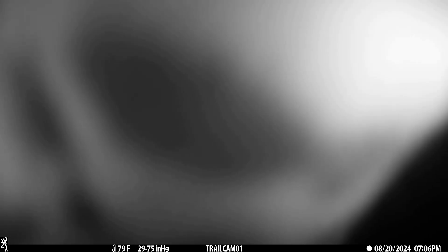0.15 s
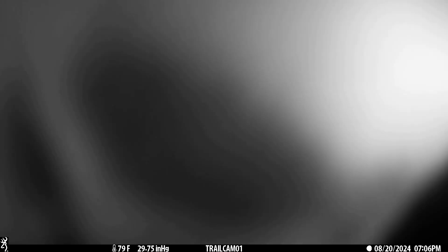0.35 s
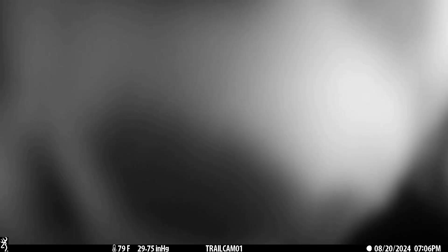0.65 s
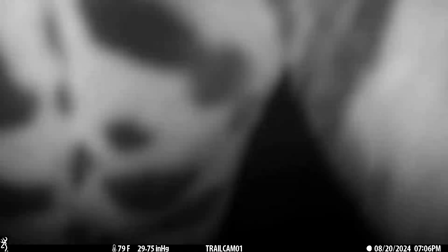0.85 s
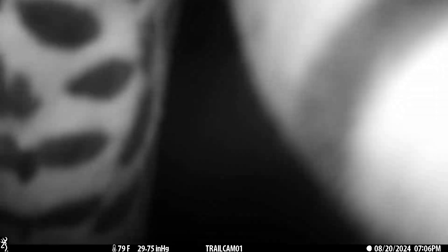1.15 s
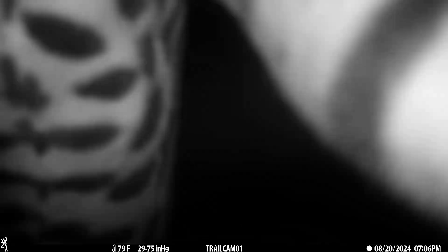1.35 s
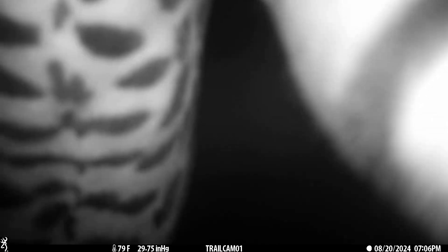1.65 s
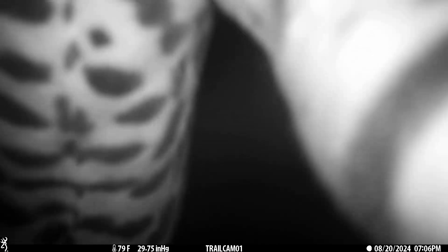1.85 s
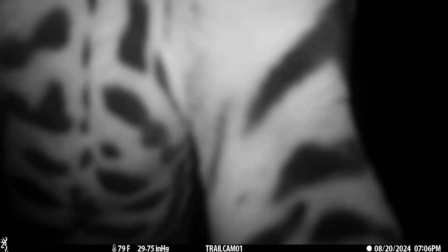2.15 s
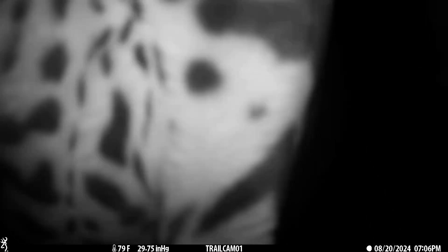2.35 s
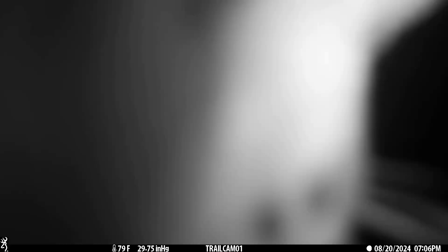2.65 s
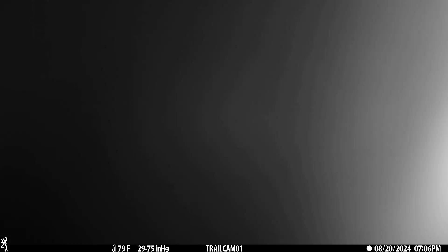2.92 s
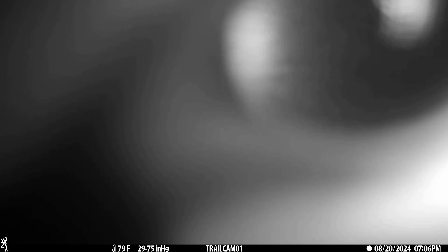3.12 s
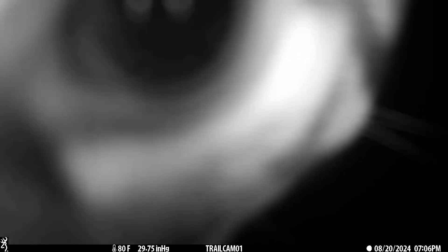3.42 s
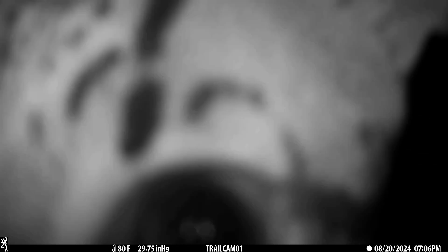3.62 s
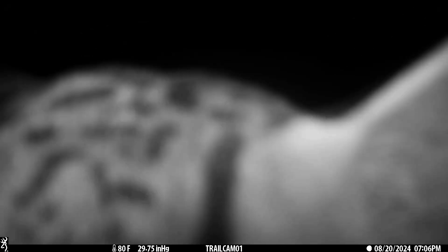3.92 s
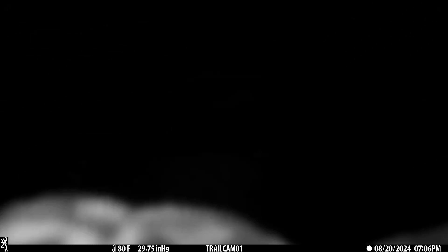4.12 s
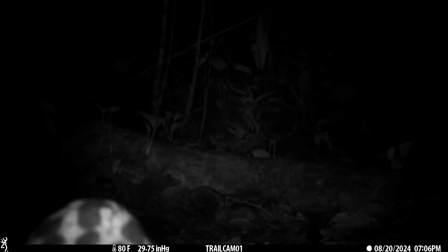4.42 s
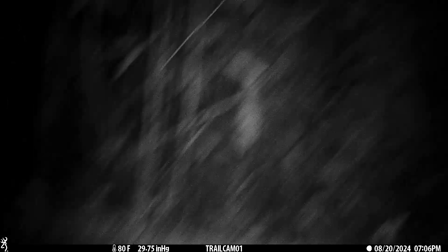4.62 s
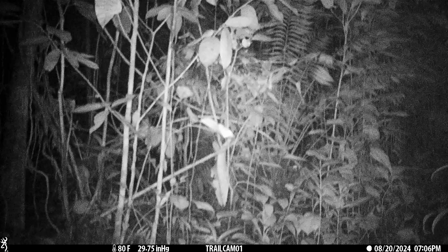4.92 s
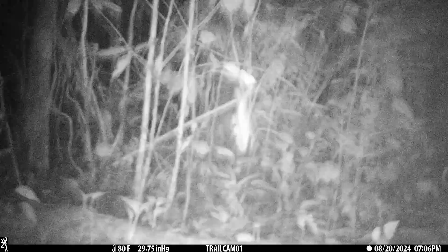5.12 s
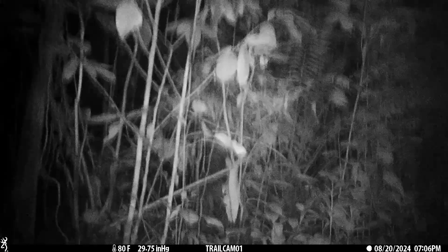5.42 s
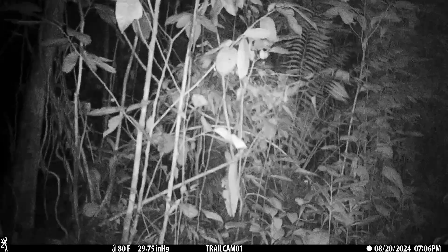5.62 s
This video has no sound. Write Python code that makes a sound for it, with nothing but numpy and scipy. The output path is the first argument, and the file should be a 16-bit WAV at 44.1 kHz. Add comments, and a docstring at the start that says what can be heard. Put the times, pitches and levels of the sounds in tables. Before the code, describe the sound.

A wild cat rubs against a plastic camera case with scrapes, clicks and knocks, then rustles leaves, over night insects and steady hiss.

```python
"""A wild cat rubs its head along a trail camera, then walks off and bumps the mount.
Rough strokes and single slips ring the plastic shell; the hardest slips overload the input.
Blows thud and ring the hollow case, fur brushes it, paws crackle in the leaf litter.
Behind it all, night insects of the forest sing at 4-8 kHz over a steady hiss."""
import sys
import numpy as np
from scipy import signal
from scipy.fft import rfft, irfft, next_fast_len
from scipy.io import wavfile
from scipy.ndimage import uniform_filter1d

SR = 44100
rng = np.random.default_rng(int(sys.argv[2]) if len(sys.argv) > 2 else 0)


def unload_wav(signal):
    """Save mono or channel-first audio to the path in sys.argv[1] as 16-bit WAV at rate SR, clipped to [-1, 1]."""
    wavfile.write(
        sys.argv[1],
        SR,
        np.round(np.clip(np.atleast_2d(signal).T, -1, 1) * 32767).astype(np.int16),
    )


N = 254456
TIME = np.arange(N) / SR


# Spectrum of a push on the whole case: (frequency [Hz], gain [dB])
PUSH_SPECTRUM = [(20, -11), (70, -5.5), (200, -5.5), (310, -11.5), (440, 7.5), (560, 0), (1200, -2.5),
                 (2200, 1), (3500, 3), (5500, -18), (12000, -57)]
# Hard strokes: (peak time [s], length [s], shell level [dB], push level [dB], squeak pitch [Hz])
HEAD_STROKES = [(0.404, 0.055, -26.5, -38, 3340), (.495, .027, -26, -35.5, 3200),
                (0.569, 0.044, -33, -39, 3100), (.607, .017, -23.5, -38.5, 3270),
                (0.636, .045, -31.5, -41, 2920), (0.709, .07, -35.5, -45, 3090),
                (1.223, .09, -33, -54, 3180), (1.275, .018, -24, -31.5, 3200),
                (1.388, 0.017, -18, -27, 3260), (1.402, .014, -14.5, -25.5, 3350),
                (1.428, .024, -30, -26.5, 3000), (1.463, 0.017, -18, -34, 3900),
                (1.626, 0.0085, -33, -52, 3400), (1.958, .027, -28.5, -43, 3620),
                (2.979, 0.048, -36, -47, 4200), (3.13, .038, -35.5, -48, 4200),
                (3.943, .044, -31, -44.5, 1140), (4.538, .008, -23, -37, 3100),
                (4.556, .012, -25, -34, 3900), (5.056, 0.012, -36, -26.5, 3100),
                (5.372, .024, -25.5, -26.5, 3800)]

def scrapes(rise_share=0.47, lock_s=0.078):
    """Dense stick-slip clicks ring the shell while the same stroke pushes on the whole case."""
    out = np.zeros(N)
    for time_s, length_s, shell_db, push_db, squeak_hz in HEAD_STROKES:
        lead_s, swell = stroke(rise_share * length_s, (1 - rise_share) * length_s)
        n = len(swell)
        grip = gain_of(1.7 * wander(n, hz=170))  # the contact catches and lets go
        slips = grip * grains(n, per_s=7000, spread_db=2.5)
        ring = unit_rms(colour(slips, shell_gain_db)[:n])
        shoves = grip * grains(n, per_s=7000, spread_db=-0.5)
        push = unit_rms(colour(shoves, lambda hz: curve_db(PUSH_SPECTRUM, hz) + mode_lift_db(hz))[:n])
        # A slow rub locks onto one resonance; a quick one has no time to.
        squeak = length_s / lock_s * band_noise(n, squeak_hz, width_hz=260)
        rub = gain_of(shell_db) * unit_rms(ring + squeak) + gain_of(push_db) * push
        add(out, time_s - lead_s, swell * rub)
    return out


# Slips of tooth, whisker or claw: (time [s], strength [dB])
SINGLE_SLIPS = [(0.4234, -12.5), (0.5131, -7), (0.5994, -14), (0.6054, -14), (1.1997, -21), (1.2715, -9),
                (1.2931, -7.5), (1.3006, -4.5), (1.399, -5), (1.4155, -4), (1.4601, 0.5), (1.4903, -19),
                (1.9298, -17.5), (1.9384, -15), (2.9305, -25), (4.5089, -15), (4.5155, -10), (4.524, -13),
                (4.5308, -8.5), (5.0527, -11.5), (5.1238, -15), (5.1367, -20), (5.3527, -15.5)]

def ticks(chatter_s=0.0031, rattle_s=0.008, rattle_db=-27, squeal_hz=3520, squeal_s=0.004):
    """A sharp slip, brief chatter and a faint rattle ring the shell; hard slips also squeal."""
    out, t = np.zeros(N), np.arange(SR // 20) / SR
    squeal = np.sin(np.pi * np.minimum(t / squeal_s, 1)) ** 2 * np.sin(2 * np.pi * squeal_hz * t)
    decay = np.exp(-(t / chatter_s) ** 2) + gain_of(rattle_db) * np.exp(-t / rattle_s)
    for time_s, strength_db in SINGLE_SLIPS:
        force = 0.22 * rng.standard_normal(len(t)) * decay
        force[0] += 1
        pitch_ratio = 1.02 + 0.004 * strength_db  # softer slips ring lower
        crack = colour(force, lambda hz: shell_gain_db(hz / pitch_ratio))[:len(t)]
        crack /= abs(crack).max()
        strength = gain_of(strength_db)
        add(out, time_s, gain_of(-1.5) * strength * crack + gain_of(-3) * strength ** 3 * squeal)
    return out


# Broad response of the shell: (frequency [Hz], gain [dB])
SHELL_SPECTRUM = [(100, -47), (500, -34.5), (1200, -15.5), (2000, -19.5), (2700, -8.5), (3300, -1),
                  (4200, -8), (4750, -17), (5500, -28), (6400, -23), (8000, -44.5), (10300, -47.5),
                  (11500, -62)]

def shell_gain_db(hz):
    """The shell's broad ring near 3 kHz with its narrow resonances on top."""
    return curve_db(SHELL_SPECTRUM, hz) + mode_lift_db(hz)


# Shell resonances: (frequency [Hz], width [Hz], lift [dB])
PLASTIC_MODES = [(1140, 140, 5.5), (1712, 53, 10.5), (2233, 120, 8), (3090, 230, 6), (3800, 79, 5.5),
                 (4250, 240, 7)]

def mode_lift_db(hz):
    """Each resonance of the plastic lifts a narrow band."""
    return sum(db / (1 + (2 * (hz - mode_hz) / width_hz) ** 2) for mode_hz, width_hz, db in PLASTIC_MODES)


# Modes of the case on its mount: (frequency [Hz], relative level [dB], T60 [s])
MOUNT_MODES = [(447.5, 0, 0.09), (653, -2, 0.058), (916, -3, 0.064), (1180, -0.5, 0.031)]
# Spectrum of a dull thud: (frequency [Hz], gain [dB])
THUD_SPECTRUM = [(20, -19), (60, 3), (120, -1), (200, 2), (290, -8), (450, -16), (1500, -39), (6000, -74)]
# Blows to the mount: (time [s], thud level [dB], ring level [dB])
BLOWS = [(.512, -49, -58), (.582, -48, -49), (1.382, -49, -45), (1.457, -38.5, -35.5), (1.501, -53, -58),
         (4.5076, -33, -42.5), (4.684, -51, -51), (4.745, -53, -63), (5.0515, -43, -25), (5.135, -52, -53),
         (5.262, -52, -44), (5.352, -45, -31.5), (5.367, -50, -35)]

def knocks(shudder=0.077, shudder_s=0.0065, attack_s=0.00053):
    """A soft blow gives a dull thud and sets the hollow case ringing on its mount."""
    out, t = np.zeros(N), np.arange(SR // 8) / SR
    ring = sum((-1) ** k * gain_of(db - 60 * t / t60_s) * np.cos(2 * np.pi * hz * t)
               for k, (hz, db, t60_s) in enumerate(MOUNT_MODES))
    ring *= 1 - np.exp(-t / attack_s)  # a padded blow takes a moment to build
    for time_s, thud_db, ring_db in BLOWS:
        force = shudder * rng.standard_normal(len(t)) * np.exp(-t / shudder_s)
        force[0] += 1
        thud = colour(force, lambda hz: curve_db(THUD_SPECTRUM, hz))
        add(out, time_s, gain_of(thud_db) * unit_peak_rms(thud))
        add(out, time_s, gain_of(ring_db) * unit_peak_rms(ring))
    return out


# Spectrum of fur on plastic: (frequency [Hz], gain [dB])
FUR_SPECTRUM = [(20, -27), (250, -17.5), (450, -13.5), (900, 3.5), (1450, 7.5), (2100, 6.5), (3200, -6.5),
                (4500, -30), (5500, -30), (9000, -34), (11500, -52)]
# Slow passes of the cheek: (peak time [s], length [s], level [dB])
CHEEK_PASSES = [(0.098, 0.21, -42.5), (0.502, 0.5, -37.5), (2.998, 0.57, -44.5)]

def fur():
    """Countless hairs flick past the case with slightly uneven pressure."""
    hairs = grains(N, per_s=12000, spread_db=2.5) * gain_of(wander(N, hz=30))
    pressure = sum(gain_of(db) * swell_at(time_s, length_s) for time_s, length_s, db in CHEEK_PASSES)
    return pressure * unit_rms(colour(hairs, lambda hz: curve_db(FUR_SPECTRUM, hz))[:N])


# Spectrum of crushed leaves: (frequency [Hz], gain [dB])
LEAF_SPECTRUM = [(100, -31), (600, -34), (1100, -14), (1550, -1.5), (2050, -9.5), (2600, 4), (4300, 2),
                 (4900, -16), (5500, -26), (6500, -20), (8300, -26.5), (10200, -36.5), (11500, -68)]
# Steps in the litter: (peak time [s], rise [s], fall [s], level [dB])
PAW_STEPS = [(.69, .05, 0.055, -37), (4.640, 0.048, 0.094, -33.5), (5.108, 0.057, 0.059, -28.5),
             (5.562, 0.026, 0.04, -21), (5.740, 0.12, 0.057, -35)]

def rustles():
    """Each step crushes leaves into a cloud of fine crackles."""
    out = np.zeros(N)
    for time_s, rise_s, fall_s, db in PAW_STEPS:
        lead_s, swell = stroke(rise_s, fall_s)
        n = len(swell)
        clumps = gain_of(0.79 * wander(n, hz=90))  # leaves give way a few at a time
        snaps = clumps * grains(n, per_s=7000, spread_db=0.5)
        crackle = colour(snaps, lambda hz: curve_db(LEAF_SPECTRUM, hz))[:n]
        add(out, time_s - lead_s, gain_of(db) * swell * unit_rms(crackle))
    return out


# Far insects (4-8 kHz), plus two faint bands of high hiss:
# (centre [Hz], width [Hz], level before shading [dB], swell depth [dB])
BACKGROUND_BANDS = [(4154, 280, -48, 1), (6140, 440, -55.5, 0), (6580, 223, -48, 0.64), (7020, 210, -59, 3),
                    (5666, 22, -70, 0), (7307, 18, -71, 0), (7733, 370, -54.5, 0.5), (10500, 200, -77.5, 0),
                    (11690, 290, -67.5, -1.5)]
# Trills of the nearest insect: (peak time [s], length [s])
NEAR_TRILLS = [(.66, 0.24), (1.35, 0.72), (2.378, 0.58), (3.545, 0.34), (4.117, 0.22), (4.587, 0.11),
               (5.128, 0.46), (5.754, 0.13)]
# The cat's head shades the microphone, less as it draws away: (time [s], gain [dB])
HEAD_SHADE = [(0, -3.5), (.75, -2.5), (1.15, 1), (1.7, -1), (2.7, 1), (5.77, 2)]

def insects_and_high_hiss(trill_hz=4795, trill_db=-49, lull_db=-54):
    """Far insects blur into bands at 4-8 kHz, the nearest trills; two faint hiss bands lie above."""
    bands = np.zeros(N)
    for hz, width_hz, db, swell_db in BACKGROUND_BANDS:
        band = band_noise(N, hz, width_hz) * gain_of(swell_db * wander(N, hz=4.3))
        bands += gain_of(db) * unit_rms(band)
    trills = sum(swell_at(time_s, length_s) for time_s, length_s in NEAR_TRILLS)
    near = (gain_of(lull_db) + gain_of(trill_db) * trills) * band_noise(N, trill_hz, width_hz=193)
    shade_db = np.interp(TIME, *np.transpose(HEAD_SHADE))
    return (bands + near) * gain_of(shade_db)


# Spectrum of the hiss: (frequency [Hz], gain [dB])
HISS_SPECTRUM = [(20, -24.5), (100, -21.5), (280, -12), (450, -7), (800, -1), (1500, 0), (3300, -0.5),
                 (4700, -3), (5250, -5.5), (5500, -30.5), (7600, -46), (8500, -25.5), (10600, -35),
                 (12500, -50)]

def hiss(level_db=-40):
    """The even hiss of the night air and the microphone."""
    noise = colour(rng.standard_normal(N + SR), lambda hz: curve_db(HISS_SPECTRUM, hz))
    return gain_of(level_db) * unit_rms(noise[SR:SR + N])


def gain_of(db):
    """Decibels to amplitude."""
    return 10 ** (np.asarray(db) / 20)


def unit_rms(x):
    """Scales to rms 1."""
    return x / np.sqrt(np.mean(x ** 2) + 1e-20)


def unit_peak_rms(x, window_samples=300):
    """Scales the loudest window to rms 1."""
    return x / np.sqrt(uniform_filter1d(x ** 2, window_samples, mode="constant").max())


def curve_db(points, hz):
    """Interpolates a spectrum on a log-frequency axis."""
    point_hz, point_db = np.transpose(points)
    return np.interp(np.log(hz + 1), np.log(point_hz + 1), point_db)


def add(mix, time_s, sound):
    """Mixes a sound in at a time."""
    part = mix[max(round(time_s * SR), 0):][:len(sound)]
    part += sound[:len(part)]


def colour(x, spectrum_db, size=4096):
    """Minimum-phase filter with gain spectrum_db(hz)."""
    hz = abs(np.fft.fftfreq(size, 1 / SR))
    log_gain = np.log(gain_of(spectrum_db(hz)))
    transfer = np.exp(np.conj(signal.hilbert(log_gain)))
    return signal.fftconvolve(x, np.fft.ifft(transfer).real[:size // 2])


def wander(count, hz):
    """Smooth random drift, rms about 1, rolled off above hz."""
    size = next_fast_len(max(count, SR))
    lowpass = np.exp(-(np.fft.rfftfreq(size, 1 / SR) / hz) ** 2)
    return unit_rms(irfft(rfft(rng.standard_normal(size)) * lowpass, size))[:count]


def grains(count, per_s, spread_db):
    """Clicks of random time, sign and size."""
    sizes = gain_of(spread_db * np.minimum(rng.exponential(1, count), 4))
    return sizes * rng.choice([-1, 1], count) * (rng.random(count) < per_s / SR)


def band_noise(count, hz, width_hz):
    """Noise of rms 1 in one narrow resonance."""
    size = next_fast_len(count)
    band = 1 / (1 + ((np.fft.rfftfreq(size, 1 / SR) - hz) / width_hz) ** 2) ** 2
    return unit_rms(irfft(band * rfft(rng.standard_normal(size)), size)[:count])


def stroke(rise_s, fall_s):
    """Lopsided bell curve: returns (time to peak [s], envelope)."""
    t = np.arange(-3 * rise_s, 3 * fall_s, 1 / SR)
    side_s = np.where(t < 0, rise_s, fall_s)
    return -t[0], np.exp(-(t / side_s) ** 2 / np.sqrt(2))


def swell_at(time_s, length_s):
    """Bell curve of height 1, about length_s wide at half height."""
    return np.exp(-2 * np.sqrt(2) * ((TIME - time_s) / length_s) ** 2)


def scene():
    """One microphone feeds both channels, the right a touch louder for the contact sounds."""
    contact = scrapes() + ticks() + knocks() + rustles() + fur()
    return contact * gain_of([[-0.35], [0.35]]) + insects_and_high_hiss() + hiss()


# The camera's fading top octave: (frequency [Hz], gain [dB])
TREBLE_ROLLOFF = [(10600, 0.5), (12000, -15.5), (14500, -9)]

def record(dry, ceiling=0.77, cutoff_hz=15000):
    """The hardest slips overload the input and spit overtones; then treble roll-off and band limit."""
    clipped = dry / (1 + (dry / ceiling) ** 6) ** (1 / 6)
    dulled = np.array([colour(side, lambda hz: curve_db(TREBLE_ROLLOFF, hz))[:N] for side in clipped])
    lowpass = signal.firwin(255, cutoff_hz, window=("kaiser", 9), fs=SR)
    return signal.oaconvolve(dulled, lowpass[None], "same")


dry = scene()
out = record(dry)
unload_wav(out)
```